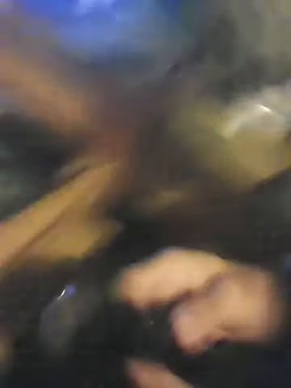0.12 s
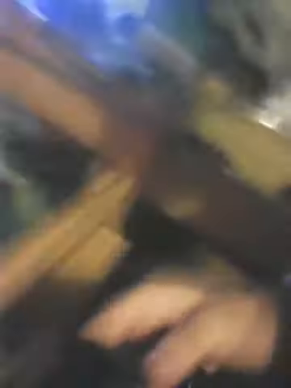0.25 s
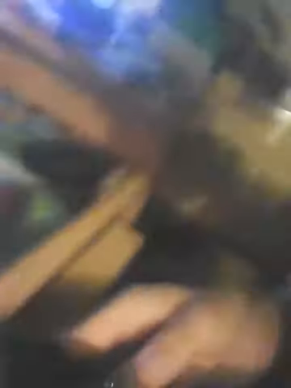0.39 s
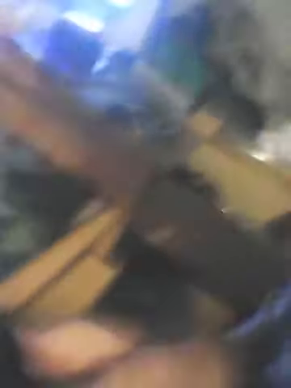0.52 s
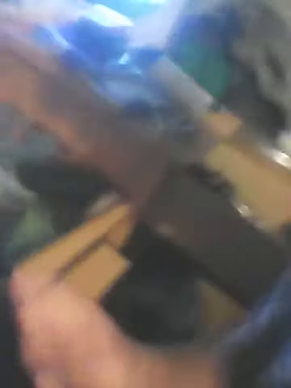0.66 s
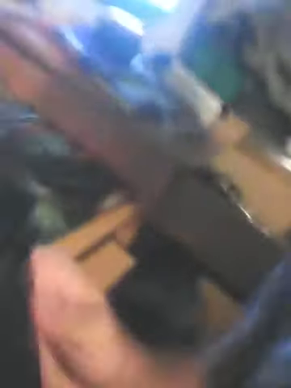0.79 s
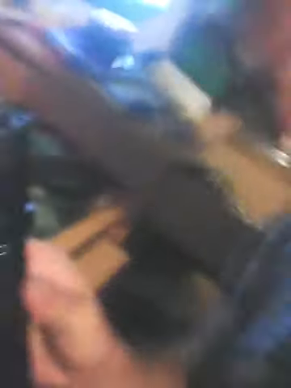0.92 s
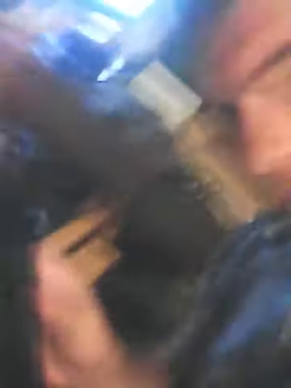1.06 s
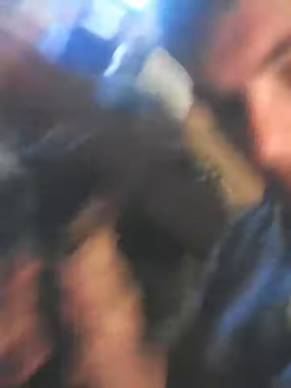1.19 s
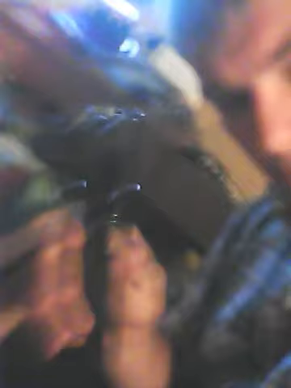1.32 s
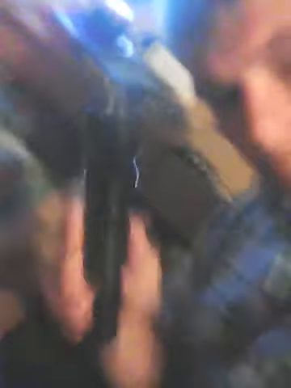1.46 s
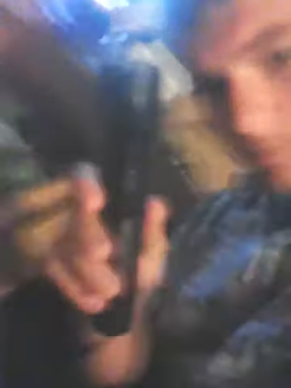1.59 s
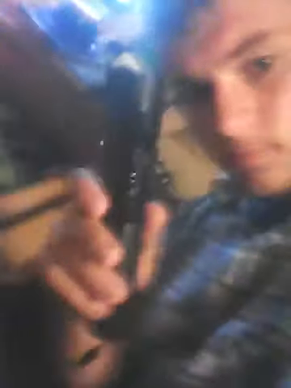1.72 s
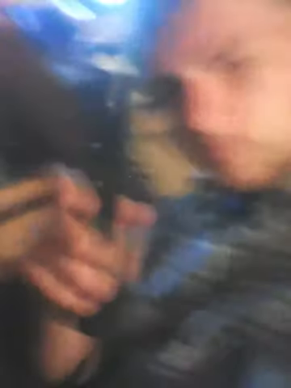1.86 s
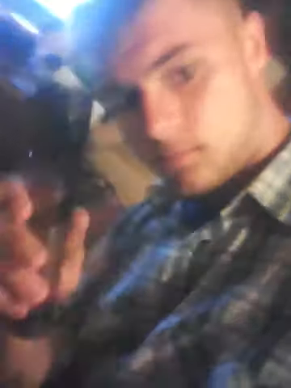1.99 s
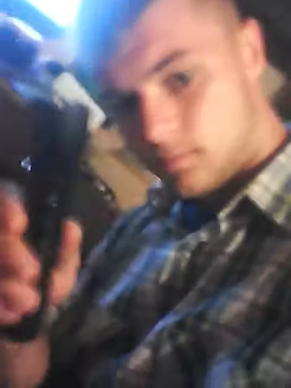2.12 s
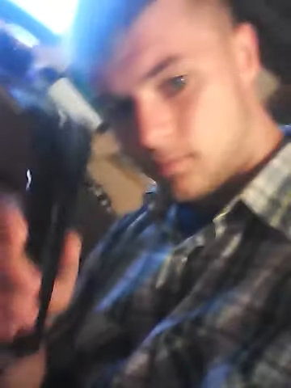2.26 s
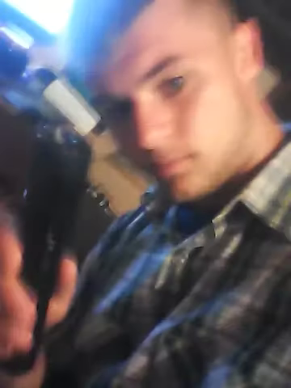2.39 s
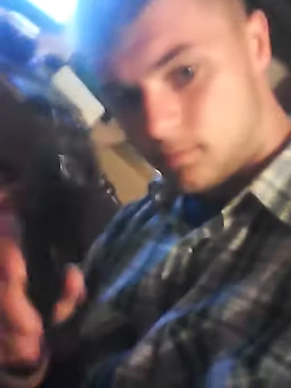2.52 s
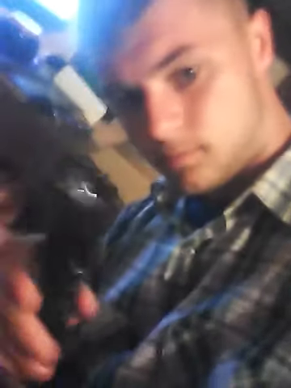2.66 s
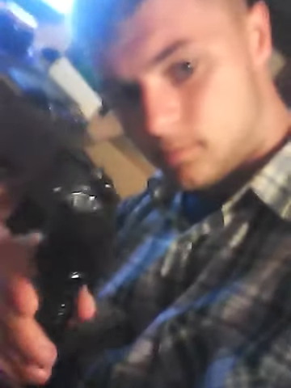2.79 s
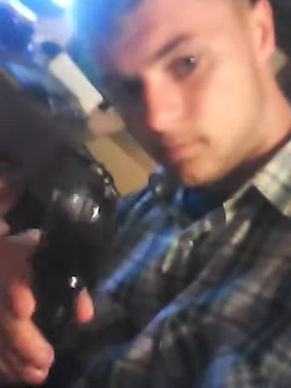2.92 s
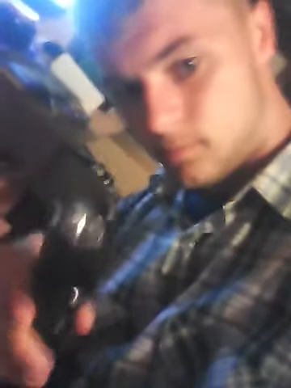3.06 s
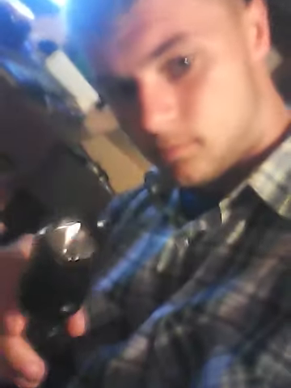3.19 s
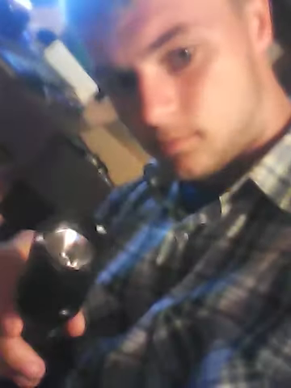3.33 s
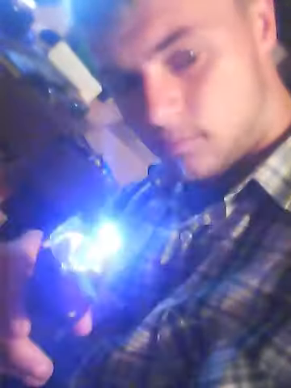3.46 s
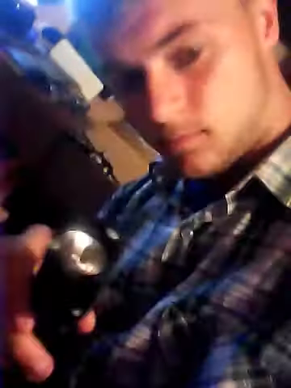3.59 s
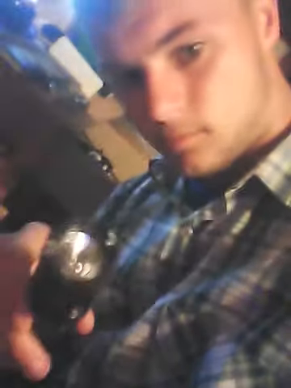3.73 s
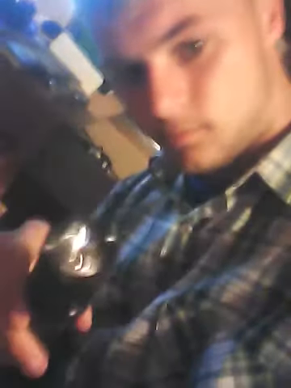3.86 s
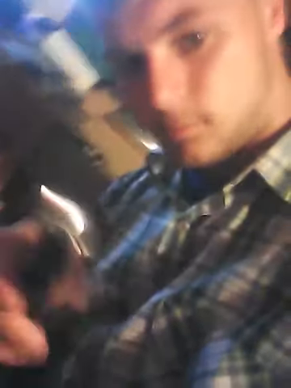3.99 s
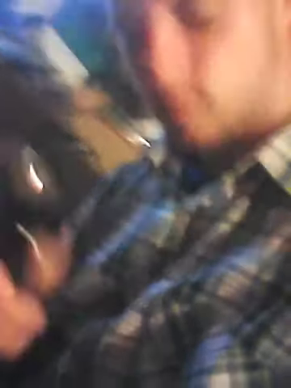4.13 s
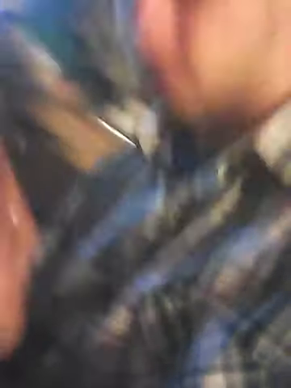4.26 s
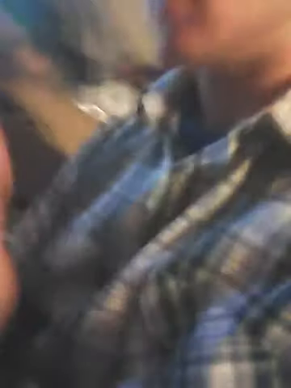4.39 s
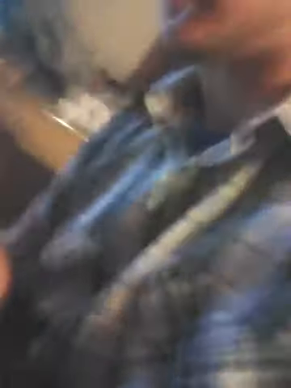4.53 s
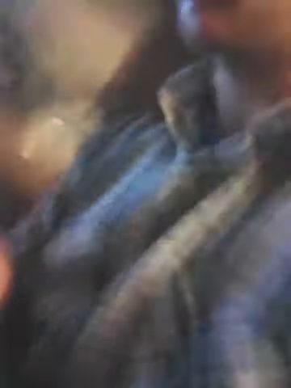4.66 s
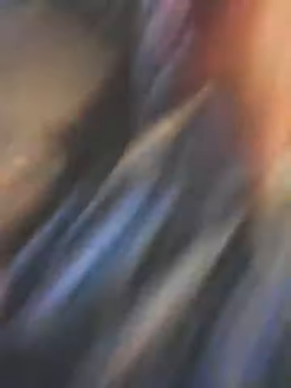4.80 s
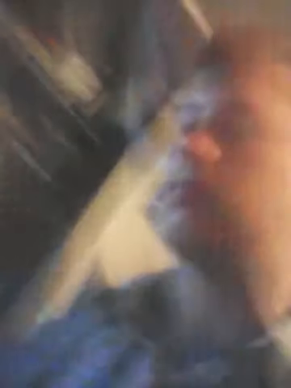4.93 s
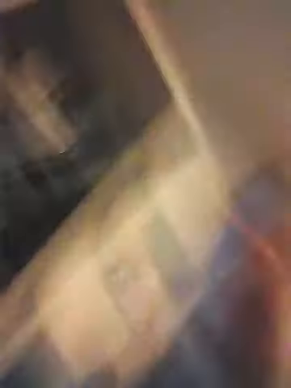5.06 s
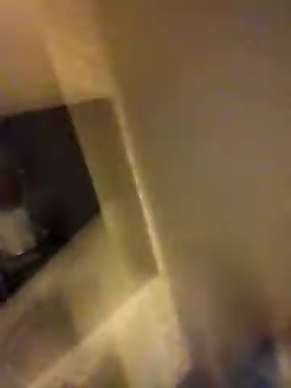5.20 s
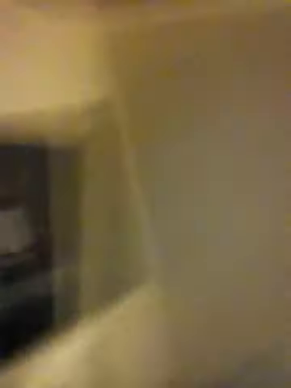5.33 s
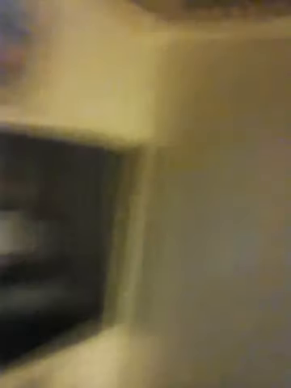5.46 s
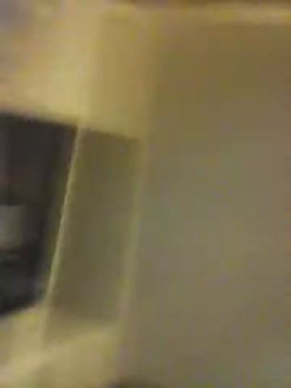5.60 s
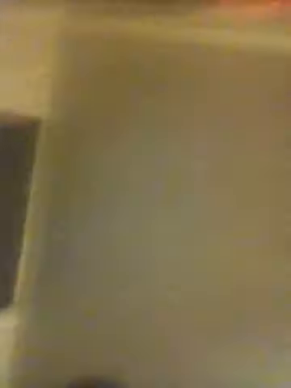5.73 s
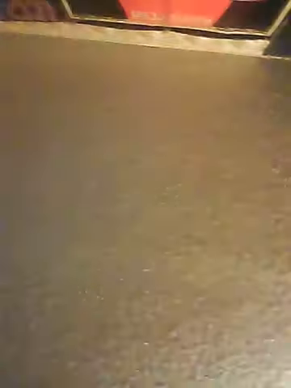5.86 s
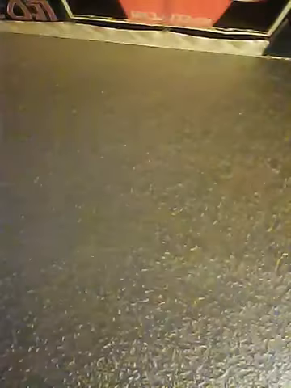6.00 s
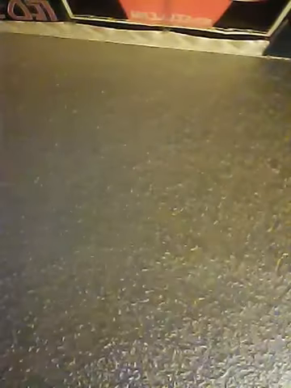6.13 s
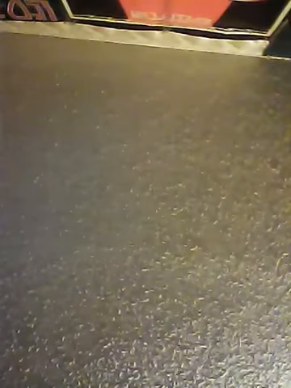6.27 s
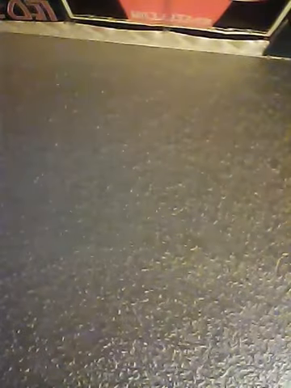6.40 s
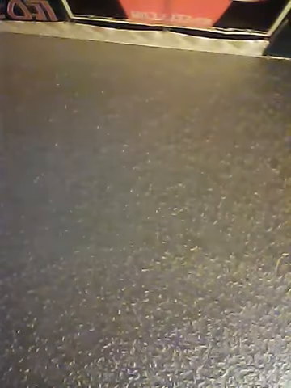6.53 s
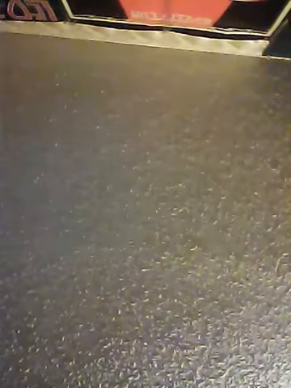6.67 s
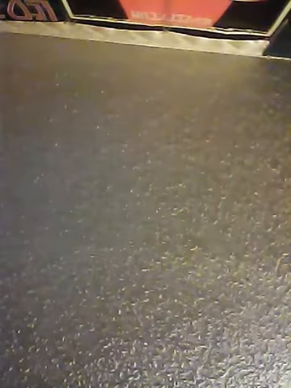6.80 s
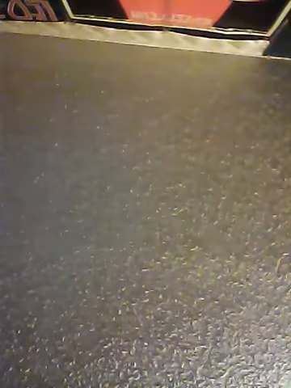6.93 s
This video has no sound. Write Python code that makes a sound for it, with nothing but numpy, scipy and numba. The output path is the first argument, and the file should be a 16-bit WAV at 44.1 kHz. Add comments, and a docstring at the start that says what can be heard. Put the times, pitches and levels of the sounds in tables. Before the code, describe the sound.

Close phone pickup in a quiet furnished room: soft boomy hum and light hiss, sparse plastic clicks and brushes of handling. Then an abrupt, very loud triple electric snap, limited into a dense block of bright crackle with a short tail. After a pause come small metallic-bright switch clicks, grainy case scrapes, and a clattering cluster of knocks on a hard surface, ending in quiet hum.

```python
"""A stun gun fires three quick sparks close to a hand-held phone in a small, dry room: shaped noise for the
echo, with a bright snap and a low thump. The phone's limiter flattens them into a block of crackle.
Small handling clicks and rubs, made of impulses and grainy noise, come before and after. Then the phone
is put down with a few knocks, made of struck modes and short bursts, over a low room hum of resonant noise."""
import sys
import numpy as np
from scipy import signal
from scipy.fft import rfft, irfft, next_fast_len
from scipy.io import wavfile
from scipy.ndimage import uniform_filter1d
from numba import njit

SR = 44100
rng = np.random.default_rng(int(sys.argv[2]) if len(sys.argv) > 2 else 0)


def master(y):
    """Save y as 16-bit WAV."""
    cut = np.clip(np.atleast_2d(y).T, -1, 1)
    pcm = np.round(cut * 32767)  # scale
    wavfile.write(sys.argv[1], SR, pcm.astype(np.int16))


N = 311595
T = np.arange(N) / SR  # time in seconds

# Low heave of the microphone under a pressure step or a hard blow.
# Each row: frequency in Hz, relative level in dB, time to die away by 60 dB in seconds.
HEAVE_MODES = [(49.3, -8.5, 0.12), (78.6, 1, 0.067), (128.9, 5, 0.034), (223, 4.5, 0.02374)]


def undb(db):
    """Decibels to gain."""
    return 10 ** (np.asarray(db) / 20)


def unit(x):
    """Scale to rms 1."""
    return x / np.sqrt(np.mean(x ** 2))


def add(out, s, x):
    """Mix x into out from time s in seconds."""
    i = int(s * SR)
    out[i:i + len(x)] += x[:N - i]


def fade(x, t60):
    """Let x die away by 60 dB in t60 seconds."""
    return x * np.exp(-np.log(1000) * T[:len(x)] / t60)


def swell(s, half_length):
    """A smooth bell-shaped rise and fall around time s, both in seconds."""
    return np.exp(-((T - s) / half_length) ** 2 / 2)


def walk(rate, size=N):
    """Random wander of rms 1, heading for a new value rate times per second."""
    k = int(SR / rate)
    steps = np.repeat(rng.standard_normal(size // k + 1), k)
    return unit(uniform_filter1d(steps, k)[:size])


def colour(points):
    """Spectrum through (Hz, dB) points."""
    hz, db = np.transpose(points)
    return lambda f: undb(np.interp(np.log(f), np.log(hz), db))


def hill(hz, octaves):
    """Spectrum with one steep-sided resonance."""
    return lambda f: 1 / (1 + (np.log2(f / hz) / octaves / 1.2) ** 4) ** 1.4


def peaks(modes):
    """Spectrum of summed resonances, each given as (Hz, width Hz, dB)."""
    def gain(f):
        return sum(undb(db) / (1 + ((f - hz * hz / f) / width / 2) ** 2 * 2) for hz, width, db in modes)
    return gain


def noise(gain, size=16384):
    """Noise of rms 1 whose spectrum follows gain(Hz), with random phases."""
    f = np.maximum(np.fft.rfftfreq(size, 1 / SR), 1)
    phases = np.exp(2j * np.pi * rng.random(len(f)))
    return unit(irfft(gain(f) * phases, size))


def steady(gain):
    """Noise with the spectrum gain(Hz) that lasts the whole scene."""
    return noise(gain, 2 * next_fast_len(N // 2 + 1))[:N]


def tint(x, gain, size=16384):
    """Send x through a causal resonator with the spectrum gain(Hz); white noise keeps its level."""
    g = gain(np.maximum(np.fft.rfftfreq(size, 1 / SR), 1))
    # folding the cepstrum puts the energy as early as possible (minimum phase)
    cepstrum = irfft(np.log(unit(g) + 1e-5))
    cepstrum[1:size // 2] *= 2
    cepstrum[size // 2 + 1:] = 0
    return irfft(rfft(x, size) * np.exp(rfft(cepstrum)))


def burst(gain, t60, rise, size=16384):
    """Random impulses that swell with time constant rise and die away, heard through a resonator."""
    shape = fade(1 - np.exp(-T[:size] / rise), t60)
    x = tint(shape * rng.standard_normal(size), gain)
    return x * np.linalg.norm(shape / shape.max()) / np.linalg.norm(x)


def ring(modes, size=16384):
    """Damped modes struck together, each slightly detuned at random; neighbours swing in opposite directions."""
    out = np.zeros(size)
    for k, (hz, db, t60) in enumerate(modes):
        detuned = hz * (1 + 0.0067 * rng.standard_normal())
        out += (-1) ** k * undb(db) * fade(np.sin(2 * np.pi * detuned * T[:size]), t60)
    return out


def rub(strokes, points, grain_db, rate):
    """Friction of two surfaces: coloured noise swells with each stroke, roughened by random grain."""
    pressure = sum(undb(db) * swell(s, half_length) for s, half_length, db in strokes)
    return pressure * undb(grain_db * walk(rate)) * steady(colour(points))


def waver(x, depth_db, rate):
    """Let each band below 3200 Hz flicker in level on its own; the treble above stays as it is."""
    out = 0
    for hz in (110, 400, 650, 880, 1200, 1600, 2200, 3200):
        band = signal.sosfiltfilt(signal.butter(2, hz, fs=SR, output="sos"), x)
        out = out + band * undb(depth_db * walk(rate))
        x = x - band
    return out + x


def in_room(x, wet_db, t60):
    """Add the short echo of the furnished room, as decaying noise, to a nearby sound."""
    # Each row: frequency in Hz, relative level in dB.
    echo_colour = [(100, 10), (1000, -6.5), (4000, -10), (16000, -21.5)]
    tail = fade(noise(colour(echo_colour)), t60)
    tail[:int(.005 * SR)] = 0  # the first reflection takes 5 ms
    return x + undb(wet_db) * signal.fftconvolve(x, tail / np.linalg.norm(tail))[:N]


def air_noise(modes):
    """Soft air noise of rms 1 with resonances; random level flicker keeps its texture uneven."""
    # Colour of the air noise. Each row: frequency in Hz, relative level in dB.
    air_colour = [(25, 8.5), (300, 2), (430, -4.5), (1200, -2), (1350, -3), (1750, -4), (2600, -6),
                  (3300, -14.5), (4200, -17.5), (5200, -24.5), (6000, -23), (7000, -39.5), (16000, -34.5)]
    flicker_db, flicker_rate = 4, 20  # rms dB, new values per second
    bed = colour(air_colour)
    f = np.linspace(1, SR / 2, num=4096)
    out = steady(bed)
    for mode in modes:
        peak = peaks([mode])
        # set the resonance against the bed
        share = np.linalg.norm(peak(f)) / np.linalg.norm(bed(f))
        out = out + share * steady(peak) * undb(flicker_db * walk(flicker_rate))
    return unit(out)


def room_air():
    """Resonant air noise that crossfades to other resonances as the phone is put down."""
    # Resonances with the phone in the hand, and lying.
    # Each row: frequency in Hz, width in Hz, relative level in dB.
    held_modes = [(506.2, 40, 5), (680, 20, 3), (781, 89, 6), (994, 87, 7), (2096, 36, 0.5),
                  (2290, 62, -3.5), (2551, 59, -3), (3742, 170, -15.5)]
    lying_modes = [(334, 23, 22.5), (485, 33, 10.5), (705, 104, 9), (996, 160, 6.5), (1492, 73, 5.5),
                   (2680, 220, -5), (3600, 120, -14.5), (4860, 1500, -19.5)]
    # The phone is lowered between these two times in seconds.
    put_down_s = (4.88, 5.4)
    down = np.interp(T, put_down_s, [0, 1])
    held = undb(2.0) * air_noise(held_modes)
    lying = undb(5.5) * air_noise(lying_modes)
    return np.sqrt(1 - down) * held + np.sqrt(down) * lying


def fan_tones():
    """Sine tones of the fan in the hum, each from a random phase."""
    # Each row: frequency in Hz, relative level in dB.
    tone_lines = [(70, -58), (177.6, -56.5), (236.9, -63)]
    out = np.zeros(N)
    for hz, db in tone_lines:
        out += undb(db) * np.sqrt(2) * np.sin(2 * np.pi * (hz * T + rng.random()))
    return out


def background():
    """A fan-like hum booms in the room's resonances, with soft air noise and a faint microphone hiss."""
    # Slow drift of the background. Each row: time in seconds, relative levels of hum and air in dB.
    drift = [(0, -47, -61.5), (0.8, -43.5, -59), (1.85, -47.5, -59), (2.25, -43.5, -59), (2.7, -44, -58.5),
             (3.4, -40.5, -58), (3.9, -48.5, -60), (5.001, -46.5, -60.5), (6.05, -40.5, -63),
             (6.6, -47.5, -65.5)]
    # Boomy room resonances. Each row: frequency in Hz, width in Hz, relative level in dB.
    boom_modes = [(72, 16.3, 0.5), (127.95, 20, -17.5), (169, 39, -3.5), (244.1, 18, -13.5)]
    s, *columns = np.transpose(drift)
    hum_db, air_db = (np.interp(T, s, c) for c in columns)
    # small random level changes in the hum
    hum = steady(peaks(boom_modes)) * undb(2.6 * walk(rate=16))
    air = room_air()
    hiss = steady(colour([(1000, 5.0), (6000, -0.5), (10000, -3.5), (14000, 0.0), (16000, -4.0)]))
    return fan_tones() + hum * undb(hum_db) + air * undb(air_db) + hiss * undb(-74.5)


def brushes():
    """Skin brushes over plastic as the stun gun is raised and turned: soft swells of smooth noise."""
    # Each row: peak time in seconds, half length in seconds, relative level in dB.
    brush_strokes = [(1.06, 0.043, -64), (1.42, 0.087, -71), (1.64, 0.073, -69), (2.31, 0.05, -76),
                     (2.56, 0.09, -75), (3.25, 0.14, -78)]
    # Each row: frequency in Hz, relative level in dB.
    skin_colour = [(1000, -3.5), (4000, 6), (6500, -6.5), (8500, -12.5), (13500, 4.5), (16000, -2.5)]
    return rub(brush_strokes, skin_colour, grain_db=0.0, rate=43)


def scrapes():
    """The phone's case scrapes in the hand and as it is set down: grainy swells of noise."""
    # Each row: peak time in seconds, half length in seconds, relative level in dB.
    scrape_strokes = [(5.169, 0.008, -39), (5.335, 0.013, -52), (5.373, 0.012, -40), (5.462, 0.012, -41),
                      (5.59, 0.056, -47.5), (5.74, 0.024, -48), (5.862, 0.028, -48.5)]
    # Each row: frequency in Hz, relative level in dB.
    scrape_colour = [(300, -17.5), (600, 2.5), (750, 10), (1100, -16), (1450, -7), (2050, -24), (2800, -19),
                     (4500, -22), (6700, -22.5), (8300, -40), (12000, -49.5)]
    return rub(scrape_strokes, scrape_colour, grain_db=4.5, rate=240)


def creaks():
    """The grip creaks just before it lets go with a click: a very short, grainy swell."""
    # Each row: peak time in seconds, half length in seconds, relative level in dB.
    creak_strokes = [(1.022, 0.0063, -37)]
    # Each row: frequency in Hz, relative level in dB.
    creak_colour = [(500, -27), (930, 6), (1350, -15), (1900, -6), (2900, -24), (9000, -43)]
    return rub(creak_strokes, creak_colour, grain_db=4.0, rate=400)


def bumps():
    """Soft low bumps against the phone: a low sine under a short swell."""
    # Each row: peak time in seconds, relative level in dB, frequency in Hz.
    bump_hits = [(1.039, -40, 119), (1.469, -40, 161), (1.682, -42.5, 172), (2.281, -42, 78.6),
                 (3.098, -38.5, 162)]
    out = np.zeros(N)
    for s, db, hz in bump_hits:
        out += undb(db) * swell(s, half_length=0.0089) * np.sin(2 * np.pi * hz * (T - s))
    return out


def slips():
    """The case slips with a brief rasp: band-limited noise broken into uneven grains."""
    # Each row: peak time in seconds, half length in seconds, relative level in dB, centre in Hz.
    slip_moves = [(0.527, 0.0072, -53.5, 1570), (1.026, 0.008, -54.5, 4570), (1.112, 0.011, -64, 4570),
                  (5.164, 0.0044, -52.5, 2620), (5.378, 0.0026, -51, 3000), (5.503, .003, -35, 1000),
                  (5.523, 0.01, -33.5, 2250), (5.545, .008, -49, 1766), (5.7265, 0.0023, -38.5, 1450),
                  (5.891, 0.011, -45, 3560)]
    out = np.zeros(N)
    for s, half_length, db, hz in slip_moves:
        grains = noise(hill(hz, octaves=0.64))
        grains = unit(grains * undb(3.5 * walk(rate=700, size=len(grains))))
        out += undb(db) * swell(s, half_length) * np.resize(grains, N)
    return out


def switch_snaps():
    """A small switch snaps on the stun gun: a bright burst, a housing knock and a longer spring ring."""
    # Each row: start in seconds, relative level in dB, centre of the snap in Hz.
    switch_moves = [(4.5524, -38.5, 7400), (4.627, -37, 8300)]
    out = np.zeros(N)
    for s, db, hz in switch_moves:
        snap = burst(hill(hz, octaves=0.62), t60=0.011, rise=0.00052)
        spring = undb(-11.0) * burst(hill(hz=6000, octaves=0.23), t60=0.082, rise=0.00053)
        housing = undb(-9.5) * burst(hill(hz=1590, octaves=1.0), t60=0.024, rise=0.0004)
        add(out, s, undb(db) * (snap + housing + spring))
    return out


def clicks():
    """Handled plastic ticks: an impulse rings the housing, loose parts chatter just after it."""
    # Each row: start in seconds, relative level in dB, centre in Hz, width in octaves.
    plastic_ticks = [(1.035, -23, 1490, 1.06), (1.377, -29, 1410, 0.85), (1.652, -57, 5260, 0.37),
                     (2.172, -44, 3040, 0.71), (3.747, -30.5, 1255, 0.74), (4.612, -44, 1500, 0.23),
                     (4.799, -48.5, 5320, 0.22), (5.061, -33.5, 4350, 0.54), (5.141, -41, 990, 0.81),
                     (5.251, -38, 900, 1.2), (5.377, -33.5, 1700, 1.44), (5.432, -36.5, 840, 0.31),
                     (5.457, -35, 895, 0.85), (5.5781, -28.5, 1200, 1.5), (5.6028, -31, 850, 0.62),
                     (5.612, -35, 1100, 1.35), (5.629, -41, 1100, 0.98), (5.7161, -28.5, 1670, 0.75),
                     (5.7323, -26.5, 1560, 0.84)]
    # Resonances of the housing, shared by all clicks. Each row: frequency in Hz, relative level in dB.
    housing_colour = [(500, -6.5), (900, 9.5), (1150, 4), (1450, 7), (2050, -8.5), (2700, -1.5), (3500, 0),
                      (4500, -3.5)]
    out = np.zeros(N)
    for s, db, hz, octaves in plastic_ticks:
        plastic = lambda f: hill(hz, octaves)(f) * colour(housing_colour)(f)
        body = undb(11.5) * tint(np.ones(1), plastic)
        chatter = undb(-4.5) * burst(plastic, t60=0.0084, rise=0.0019)
        # faint narrow ring near 2.7 kHz
        narrow_ring = undb(-29) * burst(hill(hz=2670, octaves=0.11), t60=0.013, rise=0.00037)
        add(out, s, undb(db) * (body + chatter + narrow_ring))
    return out


def handling():
    """Plastic ticks and a switch, short grainy slides of case and skin, and soft bumps."""
    return clicks() + switch_snaps() + slips() + bumps() + creaks() + scrapes() + brushes()


def knocks():
    """Each blow on a hard surface: a crack of contact, a hollow clack, a low thud, a thin ring, scatter."""
    # Each row: start in seconds, relative levels of thud, clack and crack in dB,
    # pitch ratio of the thud, 60 dB decay time of the crack in seconds.
    blows = [(5.169, -29, -24, -65, 1.1, .004), (5.1724, -40, -33, -60, 1.01, 0.003),
             (5.5063, -8, -4.5, -2.5, 0.9, 0.0098), (5.5124, -29.5, -19, -28, 1.2, .004),
             (5.518, -10.5, -15.5, -28, 0.934, 0.004), (5.5273, -12.5, -27, -42, 0.98, .008),
             (5.5473, -9.5, -7.5, -20.5, 1.018, .0055), (5.5536, -26, -30, -36, 0.96, 0.0044),
             (5.5868, -42, -35, -36, 1.4, 0.0028), (5.733, -21, -15, -47.5, 0.98, .004),
             (5.8759, -16.5, -20, -56, 1.17, .006), (5.8854, -11.5, -24.5, -23, 0.93, 0.0055),
             (5.8877, -4.5, -9.5, -13, 1.115, 0.0069), (5.902, -26.5, -21, -40, 1.35, .004)]
    # Low modes of phone and surface, then the thin ring of the phone's case.
    # Each row: frequency in Hz (before the pitch ratio, for the thud), relative level in dB,
    # 60 dB decay time in seconds.
    thud_modes = [(63.8, -10.5, 0.16), (139.5, -2.5, 0.065), (203, -4.5, 0.075), (293.6, 2.5, 0.052),
                  (340.8, 2, 0.059), (389, -1.5, 0.042), (570, -6, 0.015), (723, -11, 0.037)]
    case_modes = [(1456, -18, 0.039), (2310, 8, 0.015), (3920, -0.5, 0.046), (4860, -13, 0.07),
                  (7200, -4.5, 0.039)]
    # Hollow clack of the case, hard contact, and the smooth hiss that the room sends back.
    # Each row: frequency in Hz, relative level in dB.
    clack_colour = [(100, -44), (250, 5.5), (500, 11), (1100, 4.5), (1600, -3.5), (2500, -21), (4000, -35),
                    (12000, -71)]
    crack_colour = [(700, -23), (1500, 2), (2500, 8), (3500, 4), (5000, 1), (6400, 8), (8300, -3.5),
                    (10000, -1), (15500, -6.5)]
    scatter_colour = [(500, 0.5), (2000, 14), (4000, -4), (8000, 6), (12000, 0), (15500, 3)]
    out = np.zeros(N)
    # the heavy modes feel the blow as a push of a millisecond or so
    push = signal.windows.hann(M=41)
    push = push / push.sum()
    # the solid first contact sounds the case cleanly
    contact = undb(18.5) * tint(np.ones(1), colour(clack_colour))
    for s, thud_db, clack_db, crack_db, pitch, crack_t60 in blows:
        struck = ring([(hz * pitch, db, t60) for hz, db, t60 in thud_modes])
        thud = np.convolve(struck, push, "full")[:-len(push) + 1]
        clack = contact + undb(-7) * burst(colour(clack_colour), t60=0.018, rise=0.00099)
        # the loose case buzzes briefly after the clack
        buzz = undb(-22) * burst(hill(hz=650, octaves=1.43), t60=0.055, rise=0.0022)
        crack = burst(colour(crack_colour), crack_t60, rise=0.0016)
        scatter = undb(-39) * burst(colour(scatter_colour), t60=0.23, rise=0.003)
        # the crack excites the case and heaves the microphone
        case = undb(-16) * ring(case_modes)
        heave = undb(-11) * ring(HEAVE_MODES)
        hard = undb(crack_db) * (crack + case + heave + scatter)
        add(out, s, undb(thud_db) * thud + undb(clack_db) * (clack + buzz) + hard)
    return out


def spark_echo():
    """Dense echoes of a discharge in the small room: decaying noise with random grain in its level."""
    # Colour of the echo. Each row: frequency in Hz, relative level in dB.
    spark_colour = [(150, -10.5), (650, -29.5), (1100, -12.5), (2000, -1), (4400, -1.5), (5700, 2),
                    (7000, 2.5), (8000, 3), (8300, -8), (8600, 3), (9300, 6.5), (10100, 5.5), (10900, 3),
                    (15500, -1)]
    # Narrow resonances that stand out. Each row: frequency in Hz, width in Hz, relative level in dB.
    spark_peaks = [(871, 35, -13), (2005, 54, 5.5), (2810, 25, 4), (3726, 15, 9.5), (5760, 33, 8.5),
                   (6670, 158.6, 6.5), (9230, 20, 6), (9400, 12, 9.5), (10130, 20, 2)]
    walls = noise(lambda f: np.hypot(colour(spark_colour)(f), peaks(spark_peaks)(f)))
    # the middle of the spectrum lingers longer than the treble
    lingering = undb(-25.5) * fade(noise(hill(hz=3016, octaves=1.1)), t60=0.2)
    echo = fade(walls, t60=0.13) + lingering
    build_up = 1 - np.exp(-T[:len(echo)] / 0.0035)  # time constant in seconds
    return echo * build_up * undb(2 * walk(rate=3500, size=len(echo)))


def sparks():
    """Each discharge is a bright snap, a crack and a thump over one shared echo pattern of the room."""
    # Each row: start in seconds, relative levels of room echo, direct crack and low thump in dB.
    discharges = [(3.4745, 4.502, -5, 3), (3.516, 4.5, -15.5, -7.5), (3.5774, 4.496, -11, -10)]
    out = np.zeros(N)
    echo = spark_echo()
    for s, echo_db, crack_db, thump_db in discharges:
        snap = undb(9) * burst(hill(hz=9000, octaves=1.6), t60=0.0027, rise=0.00011)
        crack = undb(crack_db) * burst(hill(hz=660.0, octaves=1.3), t60=0.021, rise=0.022)
        thump = undb(thump_db) * ring(HEAVE_MODES)
        # random grain in the level of the echo, drawn anew for each spark
        grain = undb(1.0 * walk(rate=260, size=len(echo)))
        add(out, s, undb(echo_db) * echo * grain + snap + crack + thump)
    return out


def scene():
    """Sparks, handling and knocks over the room's background."""
    room = waver(background(), depth_db=2.5, rate=28)
    handled = in_room(handling(), wet_db=-15.0, t60=0.033)
    knocked = in_room(knocks(), wet_db=-29.5, t60=0.23)
    return (sparks() + handled + knocked + room)[None]


@njit
def follow(x, attack, release):
    """Envelope that rises quickly and sinks more slowly; attack and release are shares per sample."""
    env, e = np.empty(len(x)), 0.
    for i in range(len(x)):
        e += (abs(x[i]) - e) * (attack if abs(x[i]) > e else release)
        env[i] = e
    return env


def record(dry, ceiling_db=-6, attack_s=0.00011, release_s=0.0029):
    """The small microphone loses deep bass, a fast limiter flattens loud sounds, the top is cut off."""
    top_hz = 15850
    heard = signal.sosfilt(signal.butter(2, 32, "high", fs=SR, output="sos"), dry)
    attack, release = (1 - np.exp(-1 / (seconds * SR)) for seconds in (attack_s, release_s))
    env = follow(heard[0], attack, release)
    # the limiter looks a few samples ahead
    gain = np.roll(np.minimum(1, undb(ceiling_db) / (env + 1e-9)), -4)
    # peaks that slip past the limiter are clipped
    held = np.clip(heard * gain, -.78, .78)
    return signal.sosfilt(signal.ellip(10, .2, 80, top_hz, fs=SR, output="sos"), held)


dry = scene()
out = record(dry)
master(out)
```